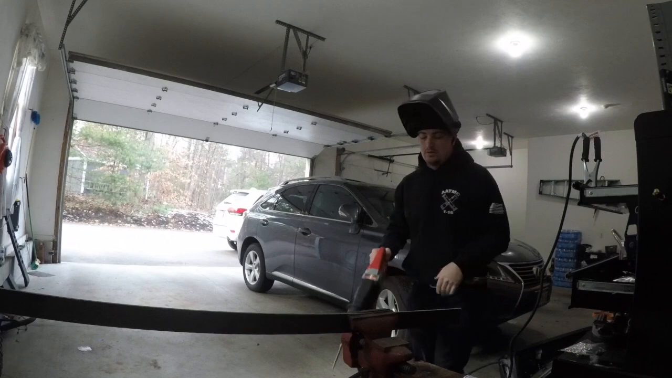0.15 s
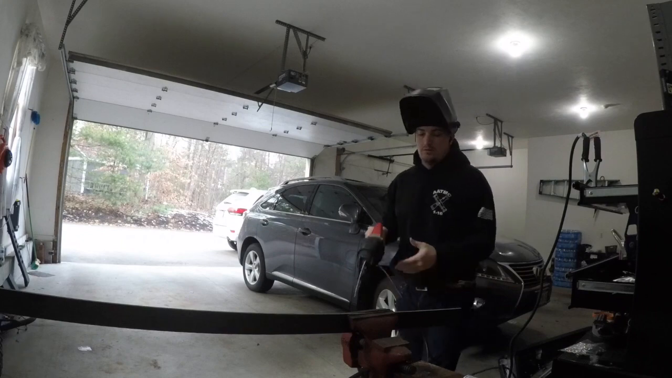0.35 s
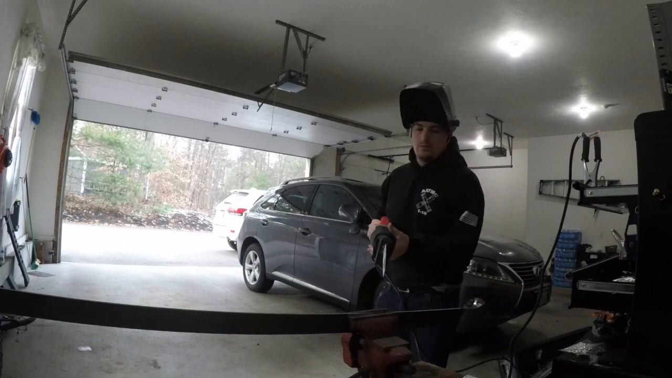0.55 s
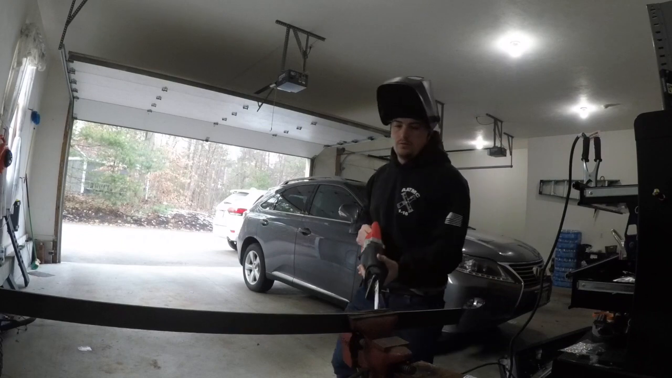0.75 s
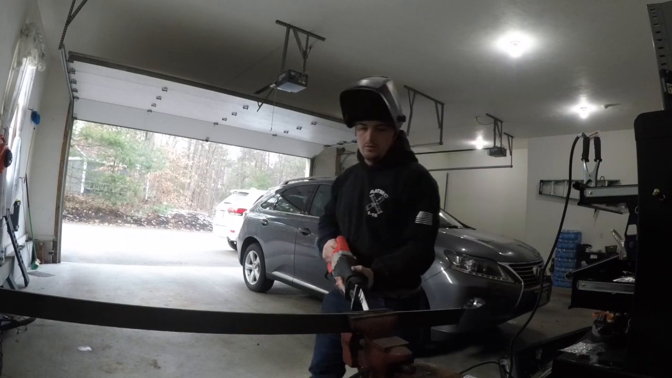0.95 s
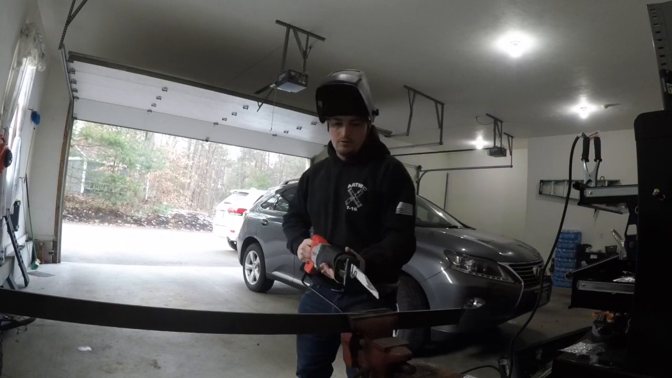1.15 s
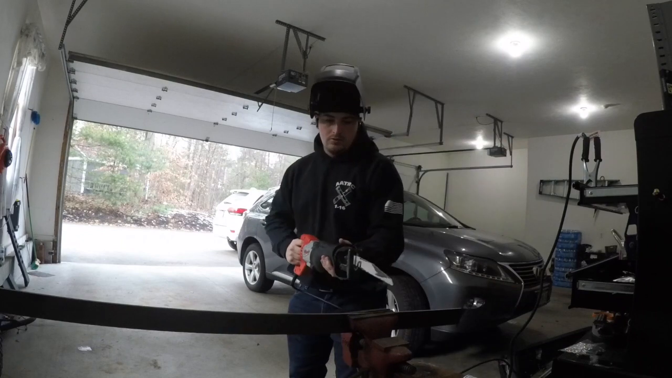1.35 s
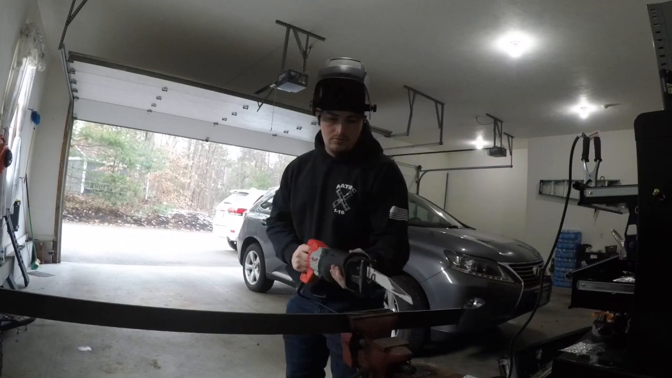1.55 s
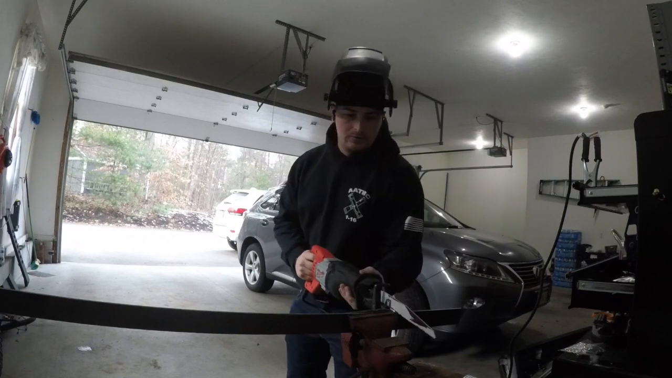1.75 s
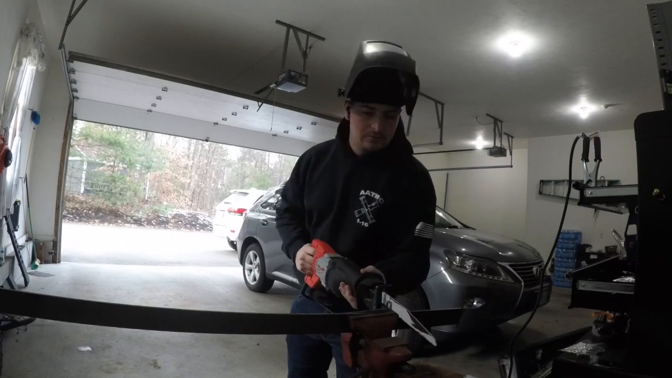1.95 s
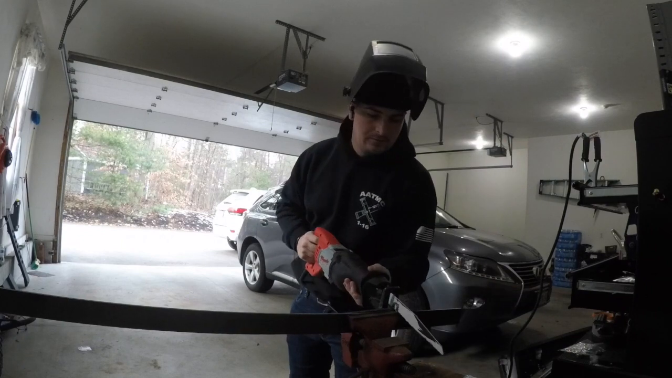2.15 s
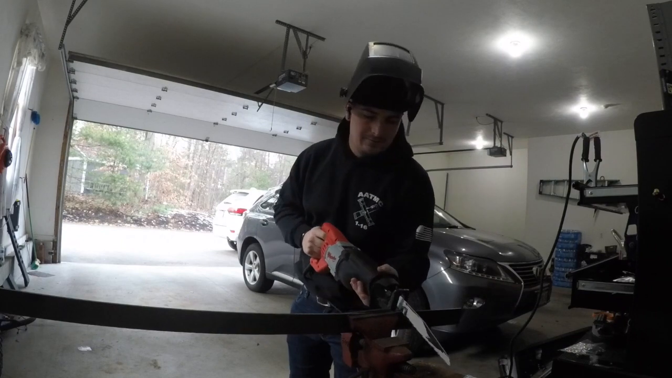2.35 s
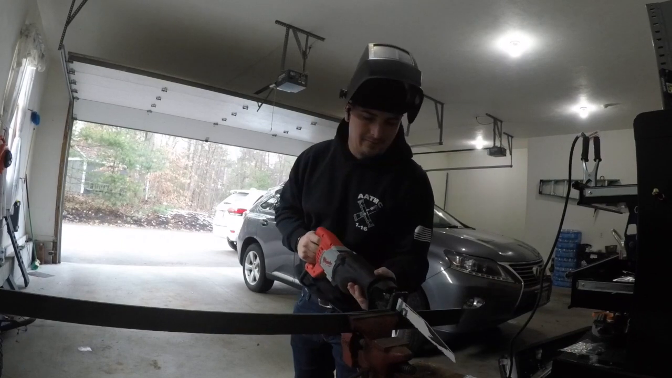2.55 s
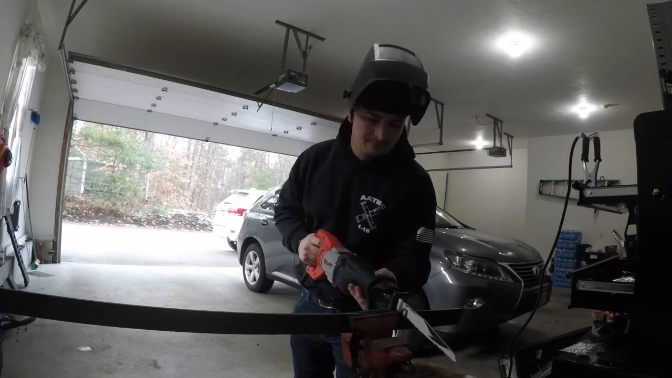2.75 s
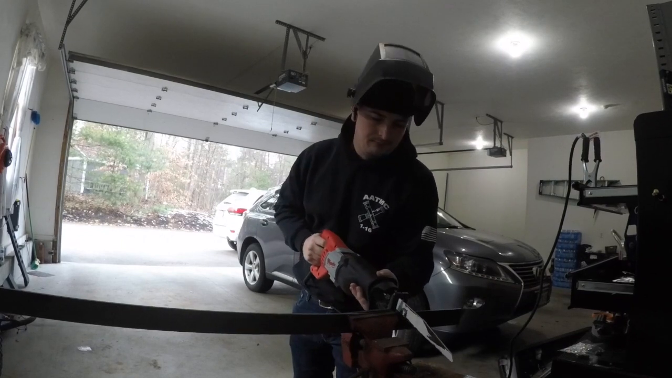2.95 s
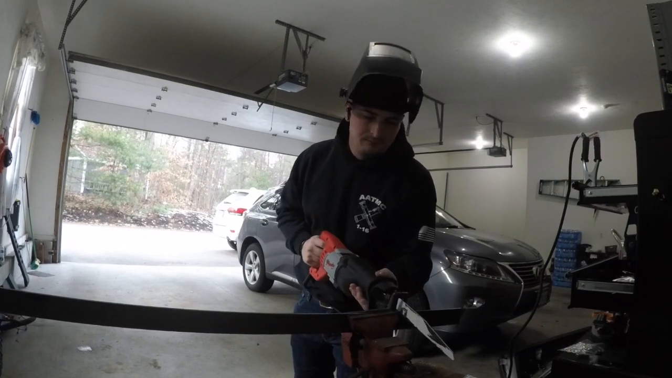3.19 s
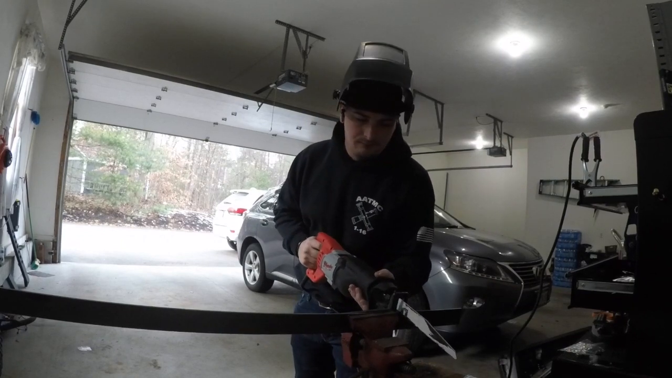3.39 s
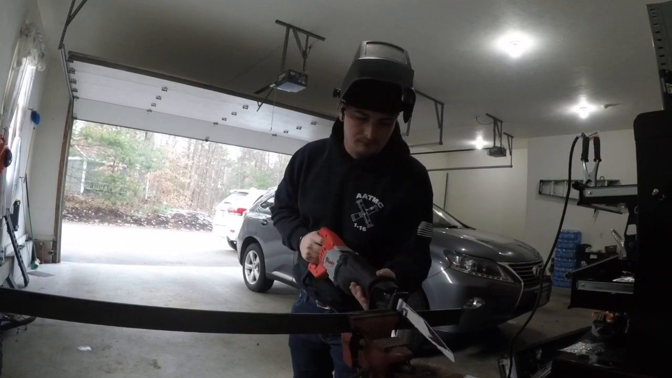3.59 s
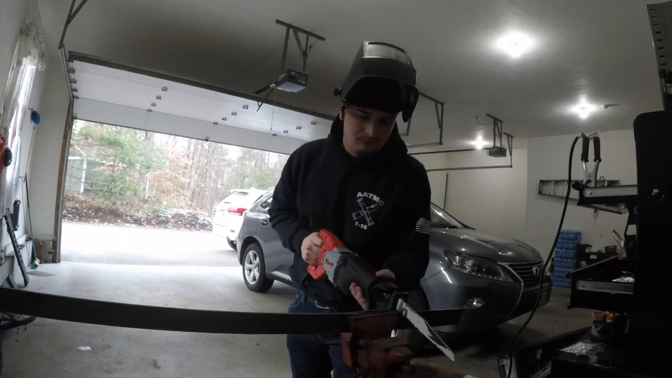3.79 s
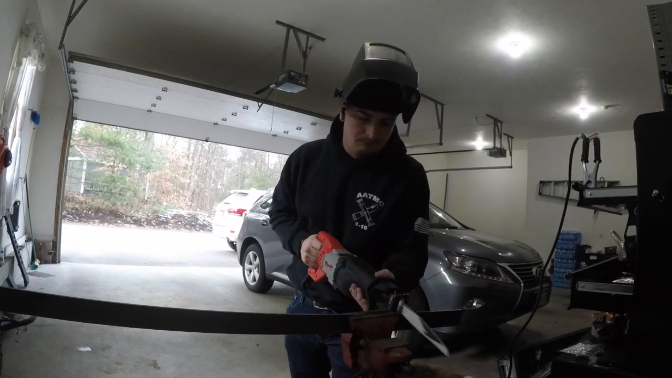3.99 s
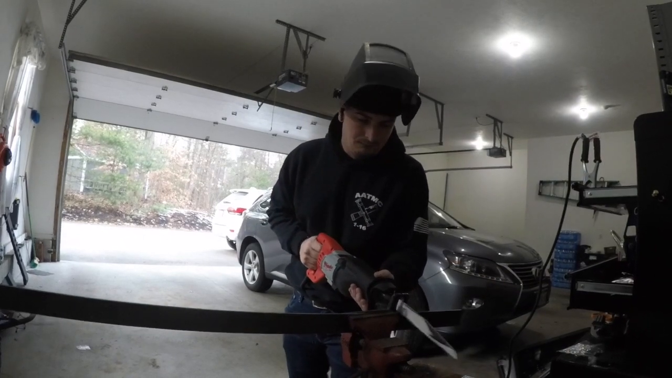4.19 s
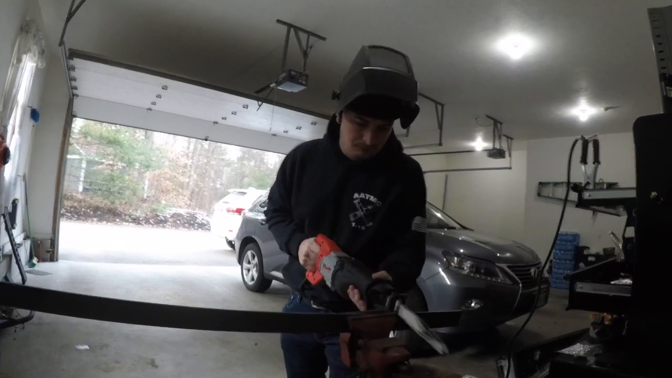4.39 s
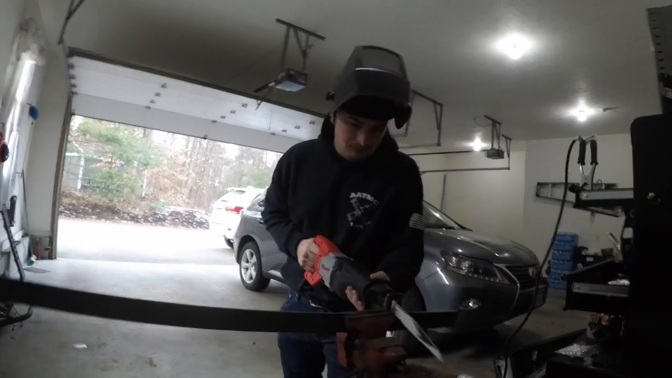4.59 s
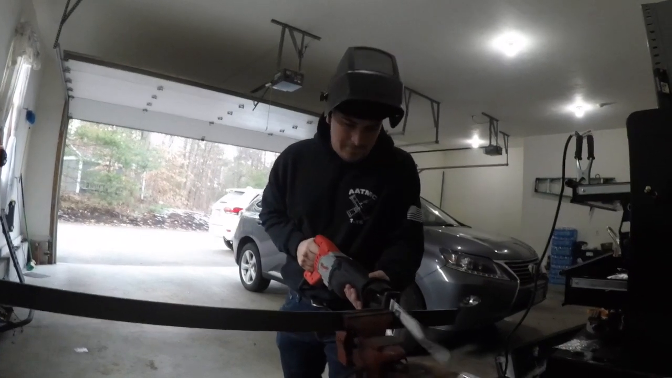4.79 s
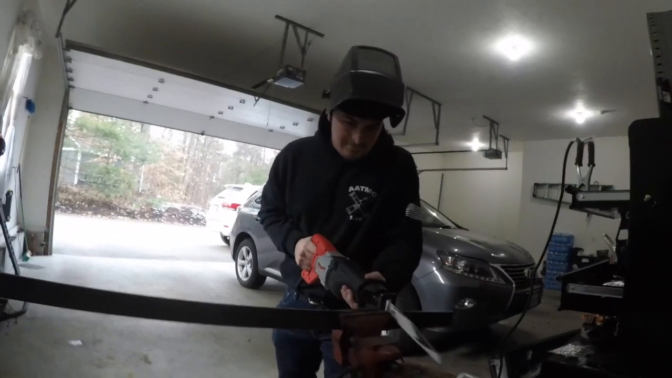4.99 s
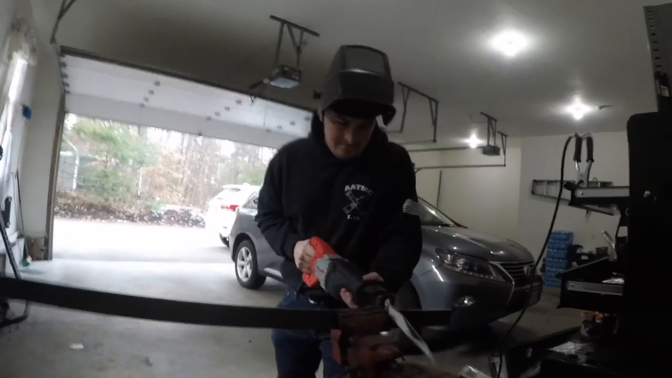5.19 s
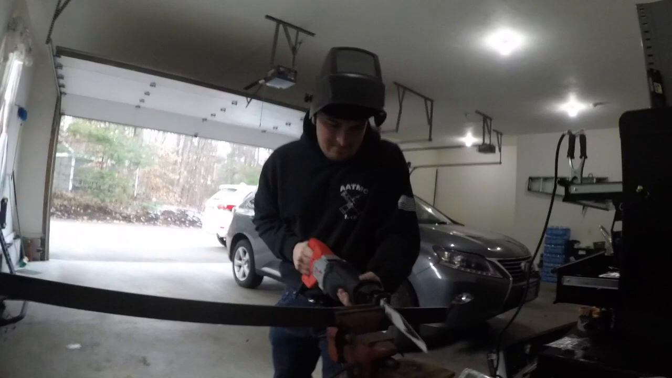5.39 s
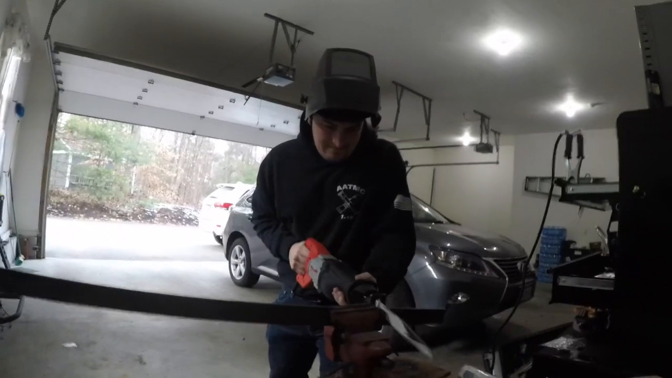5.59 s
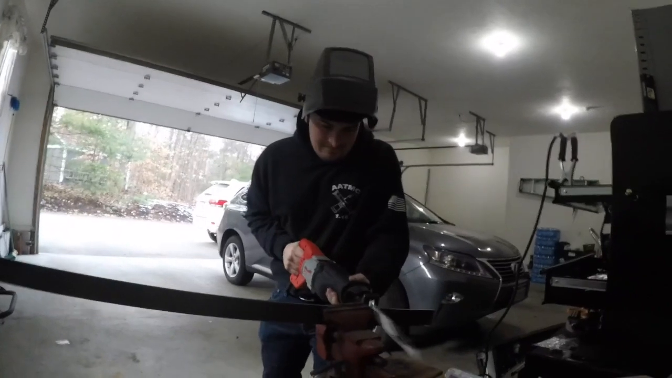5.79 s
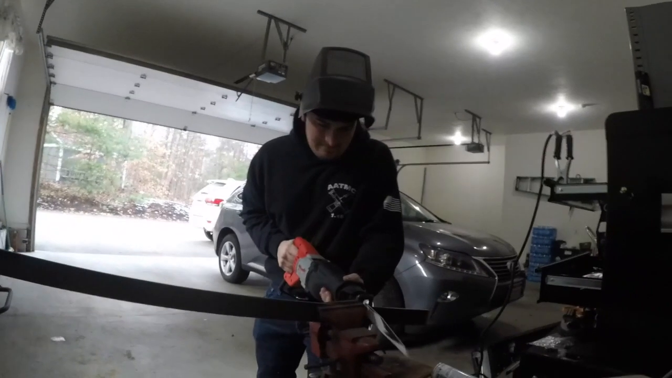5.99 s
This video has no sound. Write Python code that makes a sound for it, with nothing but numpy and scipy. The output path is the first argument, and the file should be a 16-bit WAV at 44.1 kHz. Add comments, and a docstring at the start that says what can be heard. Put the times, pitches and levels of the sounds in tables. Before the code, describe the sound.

Soft outdoor air and a faint fan hum fill a slightly echoing garage. At about 0.8 seconds metal clashes in the distance with a short, bright rattle, followed by a soft brush of cloth. From 1.7 to 2.3 seconds, close by, a saw blade taps and skids lightly along a clamped steel bar, making both ring. Around 2.4 seconds the saw clanks down on the bar and the bench rocks with a low bump. A few small plastic clicks and knocks follow. Near 3.9 seconds there is a sharp tap and a trigger click, and the reciprocating saw whirs up. From 4 seconds until the end at about 6, it cuts loudly, at roughly 34 strokes a second, knocking and rasping through the steel with squeaks, occasional kicks and bench thumps. The blade's bright ring becomes more damped by 5 seconds as it sinks in.

```python
"""In a garage, over outdoor air and a faint fan, a reciprocating saw is picked up; metal clashes far off.
Its blade taps and skids along a steel bar held in a vice, the shoe clanks down and the bench sways.
The trigger clicks, the motor whirs up, and from about 4 s the saw cuts at some 34 strokes a second:
each stroke knocks the steel, thumps the bench and drags the teeth through the cut.
The blade's ring changes as it sinks into the kerf."""
import sys
import numpy as np
from scipy import signal
from scipy.fft import rfft, irfft, next_fast_len
from scipy.io import wavfile

SR = 44100
rng = np.random.default_rng(int(sys.argv[2]) if len(sys.argv) > 2 else 0)


def materialize(psi):
    """Save the field psi as 16-bit PCM at rate SR to the path in sys.argv[1].

    A 1-D psi becomes a single channel; in a 2-D psi each row is a channel.
    """
    bounded = np.clip(np.atleast_2d(psi).T, -1, 1)
    quanta = np.round(bounded * 32767).astype(np.int16)
    wavfile.write(sys.argv[1], SR, quanta)


N = 266364
TIME = np.arange(N) / SR
FIRST_BITE_S, SHOE_LANDS_S = 3.945, 2.445

# faders of the running saw: (time [s], motor [dB], gear noise [dB], bench shake [dB])
RUN_LEVELS = [(3.96, -16, -17, -37), (4.06, -22, -20, -18.5), (5.9, -18, -22, -26), (6.04, -21, -23.5, -27)]
# pace of the saw, sagging as the cut deepens: (time [s], rate [strokes/s])
STROKE_RATE = [(3.945, 31.72), (4.06, 29.63), (4.16, 36.53), (4.42, 37.34), (4.75, 36.13), (4.91, 33.78),
               (5.38, 33.97), (5.62, 32.67), (6.04, 34.98)]
# extra-hard strokes, a few where the blade catches: (time [s], knock [dB], thump [dB])
HARD_STROKES = [(3.945, -11.5, -1), (3.959, -8.5, -14.5), (4.008, -15, -19), (4.075, -21, -23),
                (4.247, -10, -18), (4.965, -22, -7.5), (5.171, -18.5, -5.5), (5.2, -21.5, -13),
                (5.407, -14.5, -10), (6.002, -9, -26)]
# colour of teeth striking steel: (frequency [Hz], level [dB])
KNOCK_EQ = [(300, -4), (1200, 0.5), (2600, -5), (3900, 0.5), (5600, -3.5), (8400, 1.5), (10300, -4.5),
            (15000, -7.5)]
# colour of a dull thud: (frequency [Hz], level [dB])
THUD_EQ = [(30, 9.5), (90, -21.5), (160, 4), (250, 5.5), (500, -4), (900, -9)]
# ring of the blade when tapped: (frequency [Hz], width [Hz], gain [dB])
TAPPED_BLADE_MODES = [(1246, 23, 9), (2260, 63, 7.5), (2870, 84, 15), (4720, 46, 10), (6890, 76, 1.5),
                      (9580, 120, 1.5)]


def from_db(db):
    """Decibels to gain."""
    return 10 ** (np.asarray(db) / 20)


def rms_one(x):
    """Scale to unit rms."""
    return x / np.sqrt(np.mean(x ** 2) + 1e-20)


def in_time(rows):
    """One automation curve per column after the time."""
    s, *columns = np.transpose(rows)
    return [np.interp(TIME, s, c) for c in columns]


def at_hz(points, hz):
    """Read a table on a log-frequency axis."""
    f, value = np.transpose(points)
    return np.interp(np.log(hz + 1e-3), np.log(f), value)


def lowpass(x, hz, order=2):
    """Butterworth low-pass."""
    return signal.sosfilt(signal.butter(order, hz, fs=SR, output="sos"), x)


def drift(hz):
    """Smooth random modulation of rms 1."""
    return rms_one(lowpass(rng.standard_normal(N + SR), hz)[SR:])


def scatter(count):
    """Random values of spread about 1, without outliers."""
    return np.clip(rng.standard_normal(count), -1.6, 1.6)


def noise(eq, grain_db=0):
    """Coloured noise of rms 1; grain makes it a hail of unequal clicks."""
    white = rng.standard_normal(N) * from_db(grain_db * np.clip(rng.standard_normal(N), -3, 3))
    size = next_fast_len(N)
    hz = np.fft.rfftfreq(size, 1 / SR)
    spectrum = rfft(white, size) * from_db(at_hz(eq, hz)) * (hz > 10)
    return rms_one(irfft(spectrum, size)[:N])


def dull_noise(eq):
    """Noise of a soft, heavy body, with the treble rolled off."""
    return rms_one(lowpass(noise(eq), 1140, order=3))


def place(times, levels_db, shape):
    """Lay one shape at each time, each at its own level."""
    out = np.zeros(N + len(shape))
    for s, db in zip(times, levels_db):
        start = min(max(int(s * SR), 0), N)
        out[start:start + len(shape)] += from_db(db) * shape
    return out[:N]


def swell(rise_s, fall_s):
    """Envelope of one contact, height 1."""
    t = TIME[:SR]
    shape = (1 - np.exp(-(t / rise_s) ** 2)) * np.exp(-t / fall_s)
    return shape / shape.max()


def resonate(x, modes):
    """The ring that a body's resonances add to the force driving them."""
    out = np.zeros(N)
    for hz, width, db in modes:
        r = np.exp(-np.pi * width / SR)
        poles = [1, -2 * r * np.cos(2 * np.pi * hz / SR), r * r]
        out += from_db(db) * (1 - r * r) / 2 * signal.lfilter([1, 0, -1], poles, x + 1e-18)
    return out


def garage(x, wet_db, build_s=0.0037):
    """Direct sound plus a diffuse tail that dies at its own pace in each octave."""
    # reverb decay: (frequency [Hz], t60 [s])
    decay = [(80, 0.84), (300, 0.84), (1200, 0.89), (3500, 0.69), (8000, 0.45), (15000, 0.35)]
    t, edges = TIME[:SR], np.geomspace(40, 18000, 10)
    tail = 0
    for low, high in zip(edges, edges[1:]):
        octave = signal.butter(2, [low, high], "band", fs=SR, output="sos")
        band = signal.sosfilt(octave, rng.standard_normal(SR))
        tail = tail + band * np.exp(-np.log(1000) * t / at_hz(decay, np.sqrt(low * high)))
    tail *= 1 - np.exp(-(t / build_s) ** 2)
    return x + from_db(wet_db) * signal.fftconvolve(x, tail / np.linalg.norm(tail))[:N]


def background(air_db=-55.5, waver_rad=0.21):
    """A bed of outdoor air through the open door and a faint fan."""
    # hum of the fan: (frequency [Hz], level [dB])
    fan_tones = [(231, -65), (366, -67.5), (905.5, -63.5)]
    # colour of the air: (frequency [Hz], level [dB])
    air_eq = [(12, -45), (20, -3), (54, -15.5), (133, -19.5), (238, -19), (333, -18), (362, -19),
              (631, -21.5), (881, -20.5), (1010, -26.5), (15500, -51)]
    hum = sum(from_db(db) * np.sqrt(2) * np.sin(2 * np.pi * hz * TIME + waver_rad * drift(6))
              for hz, db in fan_tones)
    return hum + from_db(air_db) * noise(air_eq)


def clash(trim_db=-6.0, ring_db=-3.5):
    """A piece of metal clashes with a bright, ringing rattle."""
    # impacts: (time [s], level [dB])
    hits = [(.83, -26), (.846, -49), (0.874, -35.5)]
    # colour of the rattle: (frequency [Hz], level [dB])
    rattle_eq = [(71, -36), (120, -9.5), (286, -0.5), (923, -11), (1700, -7.5), (2290, -5.5), (3800, -8),
                 (6820, -3.5), (10000, -9.5), (15000, -19)]
    # ring of the metal: (frequency [Hz], width [Hz], gain [dB])
    metal_modes = [(2420, 330, 4.3), (6820, 110, 2.4), (7840, 460, 1), (8960, 630, 3.9)]
    s, level = np.transpose(hits)
    rattle = place(s, level + trim_db, swell(rise_s=0.0008, fall_s=0.017)) * noise(rattle_eq, grain_db=2)
    return rattle + from_db(ring_db) * resonate(rattle, metal_modes)


def handling():
    """Plastic parts click and knock without ringing; cloth brushes softly."""
    # grip, switch and housing of the saw: (time [s], click [dB], thud [dB])
    touches = [(0.048, -71, -46.5), (0.348, -61, -45), (1.96, -36, -43), (2.756, -49, -42),
               (3.208, -50.5, -46), (3.426, -34, -44.5), (3.903, -34.5, -43)]
    # sleeves brushing: (time [s], level [dB])
    rustles = [(.5, -60), (1.105, -54), (1.17, -73)]
    # colour of plastic and cloth: (frequency [Hz], level [dB])
    click_eq = [(150, -12), (700, -2), (2600, 2), (3900, 5.5), (5500, -3), (8500, -7), (15000, -18)]
    s, click, thud = np.transpose(touches)
    clicks = place(s, click, swell(rise_s=0.00014, fall_s=0.0053))
    cloth = place(*np.transpose(rustles), swell(rise_s=0.0075, fall_s=0.081))
    thuds = place(s, thud, swell(rise_s=0.0048, fall_s=0.027))
    return (clicks + cloth) * noise(click_eq) + thuds * dull_noise(THUD_EQ)


def sway(shake_db=-3.0, rock_db=-33, rock_hz=9.6, settle_s=1.0, bump_db=-31, bump_hz=72):
    """Low end: the bench trembles when pushed, bumps and rocks as the shoe lands, shakes under the saw."""
    # pushes on the bar: (time [s], level [dB])
    pushes = [(1.76, -42), (2.103, -36.5), (2.445, -27.5)]
    # rumble of the bench: (frequency [Hz], level [dB])
    shake_eq = [(11, 15), (20, -3), (26, 3), (34, 2), (52, -3), (400, -90)]
    age = np.maximum(TIME - SHOE_LANDS_S, 0)
    rocking = from_db(rock_db) * np.sin(2 * np.pi * rock_hz * age) * np.exp(-age / settle_s)
    bump = place([SHOE_LANDS_S], [bump_db], swell(rise_s=0.0072, fall_s=0.041))
    bump *= np.sin(2 * np.pi * bump_hz * age)
    tremble = place(*np.transpose(pushes), swell(rise_s=0.0068, fall_s=0.25))
    running = np.clip((TIME - FIRST_BITE_S) / 0.05, 0, 1) * from_db(in_time(RUN_LEVELS)[2] + shake_db)
    shake = noise(shake_eq)
    return rocking + bump + tremble * lowpass(shake, hz=17, order=1) + running * lowpass(shake, hz=41)


def bar_ring():
    """The steel bar flexes and booms after one blow."""
    # bending modes: (frequency [Hz], level [dB], t60 [s])
    bar_modes = [(238.3, 0, 0.3), (267, -3, 0.16), (493.6, -1, 0.58), (791, -7.5, 0.32), (1320, -2.5, 0.13)]
    t = TIME[:SR]
    return sum(from_db(db) * np.sin(2 * np.pi * hz * t) * np.exp(-np.log(1000) * t / t60)
               for hz, db, t60 in bar_modes)


def slide(from_s=1.74, to_s=2.29, fade_s=0.021, scrape_db=-68, ring_db=10, boom_db=-49.5, snag_db=2.5):
    """Teeth skid lightly along the bar to find the mark, keeping blade and bar ringing between taps."""
    contact = np.clip(np.minimum(TIME - from_s, to_s - TIME) / fade_s, 0, 1)
    skid = contact * rms_one(from_db(snag_db * drift(45))) * noise(KNOCK_EQ, grain_db=5)
    ring = from_db(ring_db) * resonate(skid, TAPPED_BLADE_MODES)
    bar = bar_ring()
    boom = signal.fftconvolve(contact * rng.standard_normal(N), bar / np.linalg.norm(bar))[:N]
    return from_db(scrape_db) * (skid + ring) + from_db(boom_db) * boom


def taps(ring_db=2.5, slip_db=-18.5, body_db=-4.5, scrape_db=-3.5):
    """Each touch cracks and sets the bar booming; the teeth chatter, then slip, and the blade rings."""
    # blade and shoe touching the bar: (time [s], crack [dB], chatter [dB], thud [dB])
    touches = [(1.732, -37.5, -35.5, -38), (1.763, -61, -46, -34.5), (1.9, -60, -48, -45),
               (2.066, -53, -39.5, -43), (2.139, -49, -40, -43.5), (2.195, -44, -40.5, -42),
               (2.382, -32, -22, -37), (2.4, -31.5, -34, -37.5), (2.415, -19, -56, -42),
               (3.876, -25.5, -36.5, -38)]
    # colour of the contact: (frequency [Hz], level [dB])
    crack_eq = [(150, 0), (500, 6), (1200, 3), (1700, 1.5), (2700, 4), (3800, 1.5), (5300, -6),
                (8000, -3.5), (15000, -20.5)]
    s, crack, chatter, thud = np.transpose(touches)
    cracks = place(s, crack, swell(rise_s=0.0002, fall_s=0.005)) * noise(crack_eq, grain_db=1)
    thuds = place(s, thud + body_db, swell(rise_s=0.014, fall_s=0.044)) * dull_noise(THUD_EQ)
    contact = place(s, chatter, swell(rise_s=0.0009, fall_s=0.0068))
    slip = place(s, chatter + slip_db, swell(rise_s=0.0081, fall_s=0.038))
    scrape = (contact + slip) * np.abs(drift(137)) * noise(crack_eq)
    ring = from_db(ring_db) * resonate(scrape, TAPPED_BLADE_MODES)
    return cracks + thuds + place(s, thud, bar_ring()) + from_db(scrape_db) * scrape + ring


def crank():
    """Turns of the crank since the first bite."""
    return np.cumsum(in_time(STROKE_RATE)[0] * (TIME >= FIRST_BITE_S)) / SR


def kerf_hold():
    """How much of the blade the kerf holds as it sinks in."""
    # grip of the kerf: (time [s], share held [0-1])
    grip = [(3.9, 0), (4.45, 0.24), (4.9, 1), (6.04, 0.88)]
    return in_time(grip)[0]


def strokes(jitter_s=0.00085):
    """One stroke per turn of the crank, as strong as the feed: times, bite dB, thump dB, share held."""
    # how hard the saw is leaned into the cut: (time [s], bite [dB], bench thump [dB])
    feed = [(3.97, -8, -18), (4.05, 3, -8), (4.11, -2, -18.5), (4.25, -0.5, -10), (4.44, -2.5, -12.5),
            (4.6, -0.5, -19.5), (4.7, 2.5, -13), (4.9, 1.5, -10), (5.04, 1.5, -17.5), (5.27, -1.5, -16.5),
            (5.37, 2, -17.5), (5.55, 3, -12.5), (5.78, 2.5, -14), (6.02, 3.5, -19)]
    turns = crank()
    at = np.searchsorted(turns, np.arange(1, turns[-1]))
    bite, thump = in_time(feed)
    return TIME[at] + jitter_s * scatter(len(at)), bite[at], thump[at], kerf_hold()[at]


def motor(body_db=-8.0, whir_db=-1.0, spin_up_s=0.019, load_db=2.0, idle_db=-11.5):
    """The gears whir up just before the bite, then run under the strokes, labouring once a turn."""
    # colours of the motor's rumble and the gears' whir: (frequency [Hz], level [dB])
    rumble_eq = [(30, -25), (75, 2.5), (160, -4.5), (300, -2.5), (700, -16)]
    whir_eq = [(200, -32), (600, 2), (1900, 2), (2500, -3), (3400, 0), (5500, -9), (8000, -13),
               (15000, -21)]
    # gear resonances: (frequency [Hz], width [Hz], gain [dB])
    gear_modes = [(599, 47, 2), (803, 150, 0), (1158, 36, 6), (3180, 53, -1.5)]
    motor_db, gear_db, _ = in_time(RUN_LEVELS)
    effort = (TIME > FIRST_BITE_S) * from_db(load_db * np.cos(2 * np.pi * crank() - 1.1))
    idle = from_db(idle_db) * np.sqrt(np.clip(1 + (TIME - FIRST_BITE_S) / spin_up_s, 0, 1))
    whir = noise(whir_eq)
    whir = rms_one(whir + resonate(whir, gear_modes))
    rumble = effort * from_db(motor_db + body_db) * dull_noise(rumble_eq)
    return rumble + np.maximum(effort, idle) * from_db(gear_db + whir_db) * whir


def bench(cuts, shove_db=4.5, lag_s=0.00453, push_s=0.00065, rattle_db=-12.5, spread_db=1.5):
    """Each stroke shoves vice and bench to and fro; their boom shifts once the blade is held."""
    # boom of bar and bench, blade free and blade held: (frequency [Hz], width [Hz], gain [dB])
    free_modes = [(153.6, 6.4, 12.3), (187, 16, 2.8), (223.5, 59, 2.5), (487, 22, 12.4)]
    held_modes = [(99, 5.9, 10.2), (160, 6, 0.98), (367, 5.4, 1.7)]
    s, _, thump, _ = cuts
    kick_s, _, kick = np.transpose(HARD_STROKES)
    thump = np.r_[thump + spread_db * scatter(len(s)), kick]
    s = np.r_[s, kick_s]
    u = (TIME[:SR // 50] - lag_s) / push_s
    to_and_fro = -u * np.exp((1 - u * u) / 2)
    held = kerf_hold()
    shove = place(s, thump + shove_db, to_and_fro) * from_db(-4.0 * (1.5 - held))
    rattle = place(s, thump + rattle_db, swell(rise_s=0.0035, fall_s=0.017)) * dull_noise(THUD_EQ)
    force = shove + rattle
    return force + resonate(force * (1 - held), free_modes) + resonate(force * held, held_modes)


def blade(cuts, knock_db=-17.0, rasp_db=-17.0, seated_db=-6, return_db=-4.0, snag_db=0.5,
          pull_lag_s=0.00072, knock_spread_db=4, rasp_spread_db=2.5, tilt_spread_db=3.5):
    """The teeth slam in with a squeak, rasp and snag through the cut, and drag back more lightly."""
    # squeaks of the teeth; ring of the blade, free and held: (frequency [Hz], width [Hz], gain [dB])
    squeaks = [(3580, 400, -4.5), (3880, 1440, -6), (8200, 390, -5)]
    free_modes = [(2880, 170, 6), (3390, 180, 5.5), (4660, 45, 5), (5230, 21, 8), (7930, 22, 7),
                  (9200, 23, 8), (9540, 23, 13), (11340, 35, 13.5), (12300, 53, 7)]
    held_modes = [(3210, 49, 1), (4320, 190, -2.5), (7470, 87, -12), (8830, 46, -2), (9190, 37, 5),
                  (11370, 100, 4), (12400, 140, 3), (14230, 220, 4)]
    # colour of teeth dragging through steel: (frequency [Hz], level [dB])
    rasp_eq = [(200, -39), (500, 9), (1100, 0.5), (2400, 3.5), (3800, 2), (5600, 3), (7200, 6),
               (10500, -4.5), (15000, -7.5)]
    s, bite, _, seated = cuts
    kick_s, kick, _ = np.transpose(HARD_STROKES)
    # a hard knock skips over the steel and rasps less; a seated blade rasps less too
    hardness = scatter(len(s))
    knock = bite + knock_db + knock_spread_db * hardness
    skip = (hardness + scatter(len(s))) / np.sqrt(2)
    rasp = bite + rasp_db + seated_db * seated - rasp_spread_db * skip
    slam = place(np.r_[s, kick_s], np.r_[knock, kick], swell(rise_s=0.00044, fall_s=0.0034))
    slam *= noise(KNOCK_EQ, grain_db=-5.5)
    # no two bites catch alike, so each favours other squeaks
    slam += sum(resonate(slam * 2 * np.clip(drift(43), 0, 1), [mode]) for mode in squeaks)
    pull = place(s + pull_lag_s, rasp, swell(rise_s=0.0047, fall_s=0.0076))
    half_turn_s = 0.5 / np.interp(s, *np.transpose(STROKE_RATE))
    back = place(s + half_turn_s, rasp + return_db, swell(rise_s=0.002, fall_s=0.0043))
    snags = rms_one(from_db(snag_db * drift(770)))
    force = slam + np.hypot(pull, back) * snags * noise(rasp_eq)
    # the treble flickers from stroke to stroke
    tilt_db = np.interp(TIME, s, tilt_spread_db * scatter(len(s)))
    dull = lowpass(force, hz=6000, order=1)
    force = dull * from_db(-tilt_db / 2) + (force - dull) * from_db(tilt_db / 2)
    # the walls of the kerf damp the blade and shift its resonances
    held = kerf_hold()
    return force + resonate(force * (1 - held), free_modes) + resonate(force * held, held_modes)


def scene():
    """Mono mix: saw and bench are close; the far clash is mostly room."""
    cuts = strokes()
    saw = garage(blade(cuts) + motor(), wet_db=-16.0) + garage(bench(cuts), wet_db=-6.5)
    touches = garage(taps() + slide() + handling(), wet_db=-12.0)
    return (saw + touches + garage(clash(), wet_db=3.5) + sway() + background())[None]


def record(dry, cutoff_hz=15200):
    """Soft-clip the loudest peaks and cut the very top."""
    squashed = dry / (1 + dry ** 4) ** (1 / 4)
    return signal.sosfilt(signal.ellip(10, 0.1, 80, cutoff_hz, fs=SR, output="sos"), squashed)


dry = scene()
out = record(dry)
materialize(out)
```